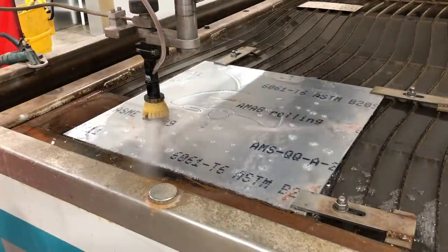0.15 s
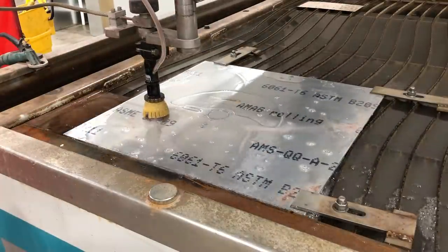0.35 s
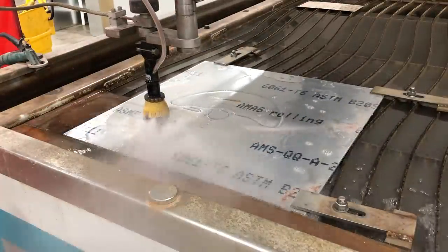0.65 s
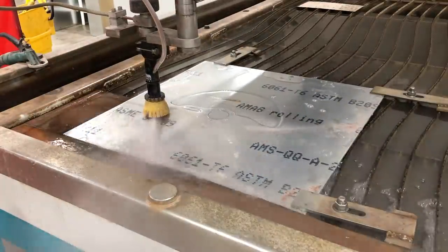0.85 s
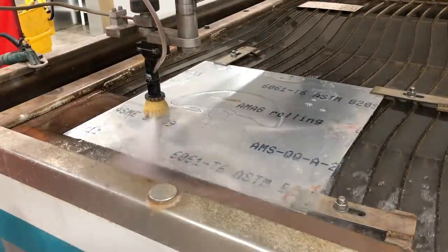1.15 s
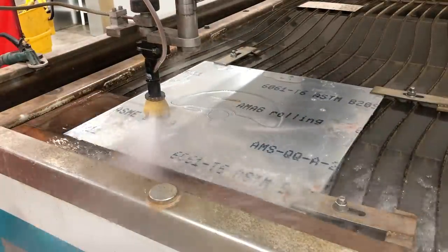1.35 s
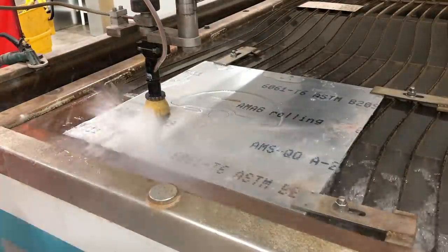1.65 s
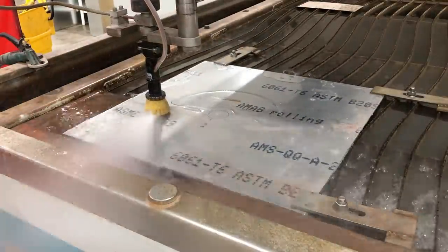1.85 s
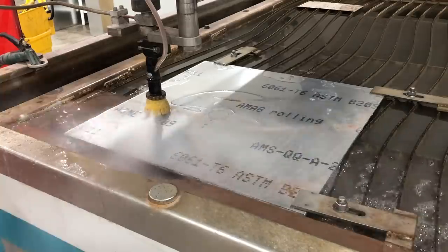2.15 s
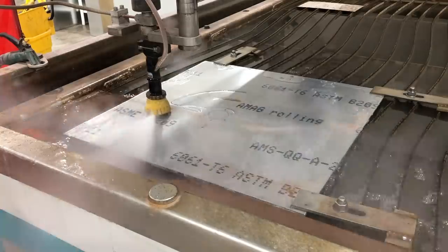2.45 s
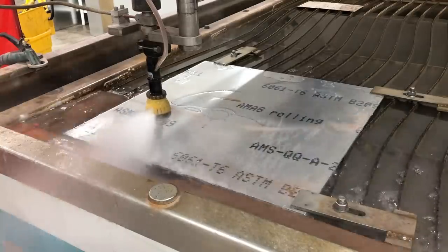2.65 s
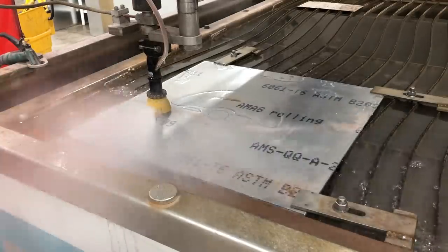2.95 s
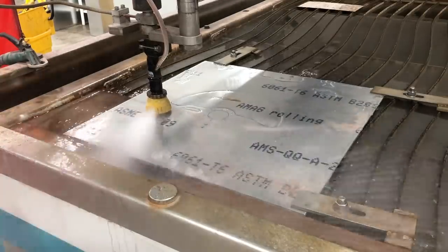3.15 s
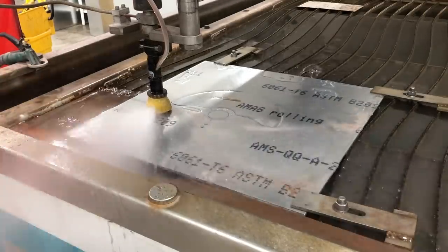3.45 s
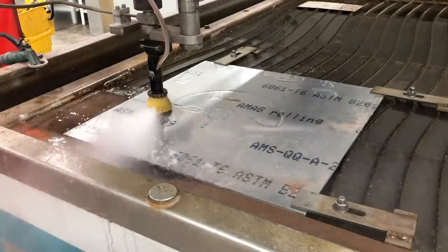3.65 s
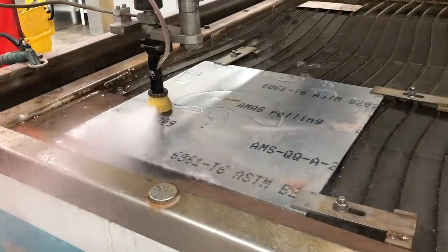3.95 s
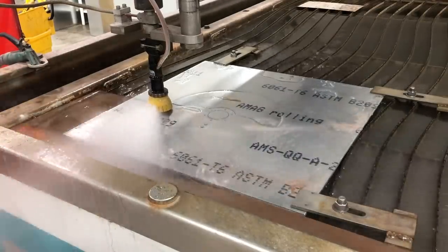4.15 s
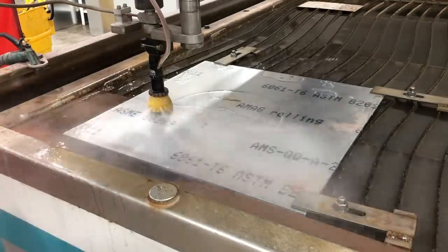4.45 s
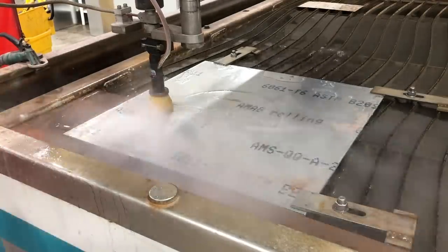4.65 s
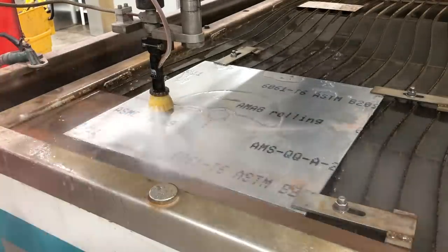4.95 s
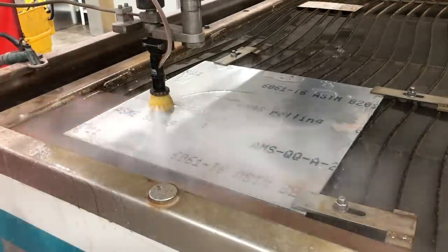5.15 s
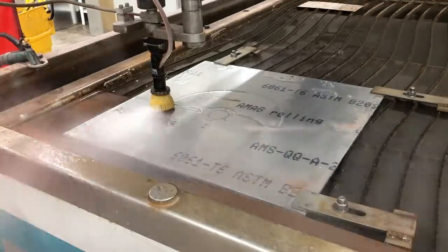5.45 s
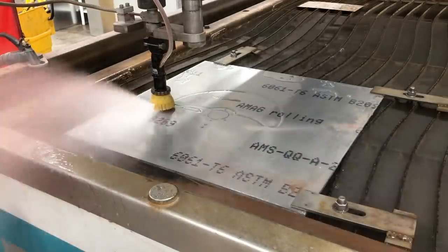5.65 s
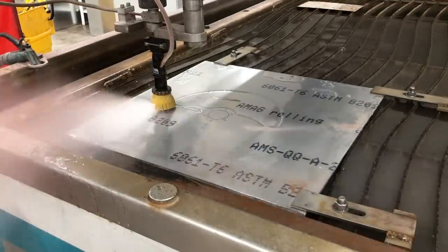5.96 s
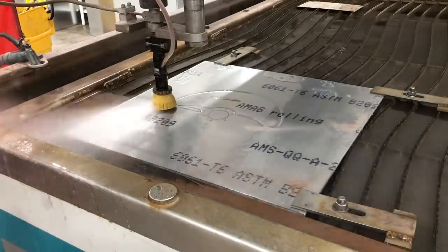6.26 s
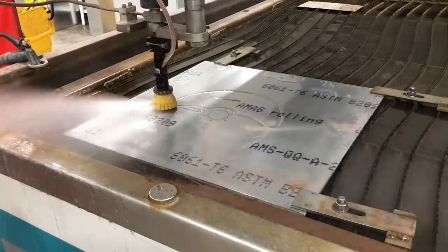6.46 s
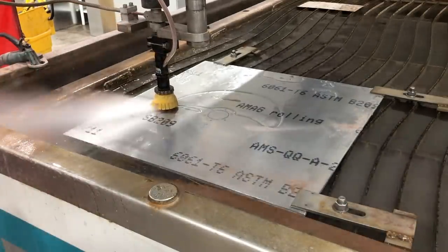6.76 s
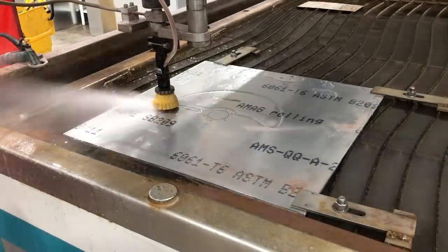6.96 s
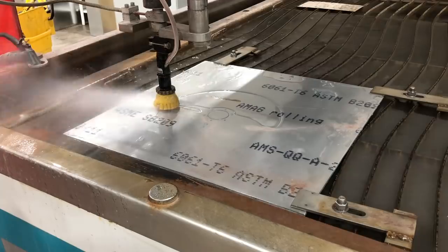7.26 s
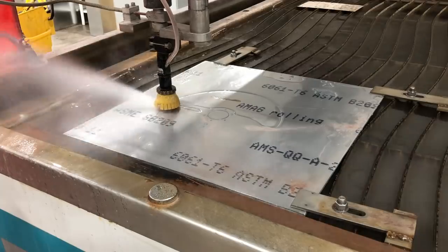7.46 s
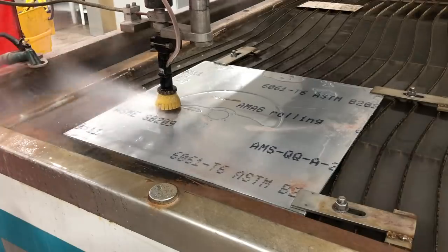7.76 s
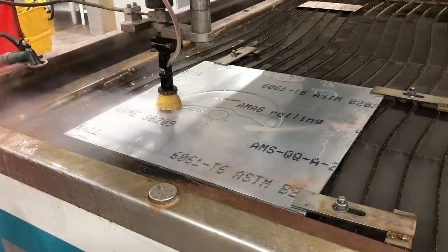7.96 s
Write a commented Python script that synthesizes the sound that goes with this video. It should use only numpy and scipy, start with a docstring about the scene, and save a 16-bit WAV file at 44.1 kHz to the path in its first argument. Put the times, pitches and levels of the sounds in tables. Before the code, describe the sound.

Close up in a workshop, a waterjet cutter hisses harshly through a sheet of aluminium while water splashes and gurgles beneath. The hiss keeps choking and surging, dips briefly, and is joined by rough, thumping bursts of churning water. Halfway through, the rumble falls away and the hiss turns quieter and uneven, with a few spits, before building back into a stronger, more even spray.

```python
"""A waterjet cuts an aluminium sheet close to a mono microphone. Its hiss is broadband noise that surges
and sags as spray is thrown about, with lower splashing beneath; both change colour twice with the cut.
In bursts the water roars and thumps, in clicks dispersed so that their bass arrives late.
Two faint whistles, narrow resonances driven by noise, sound at the start; a wider one flares once."""
import sys
import numpy as np
from scipy import signal
from scipy.fft import rfft, irfft, next_fast_len
from scipy.io import wavfile
from scipy.ndimage import uniform_filter1d, map_coordinates

SR = 44100
rng = np.random.default_rng(int(sys.argv[2]) if len(sys.argv) > 2 else 0)


def generate_wav(signal):
    """Clip the signal to [-1, 1] and save it as 16-bit WAV at the path in sys.argv[1]."""
    frames = np.transpose(np.atleast_2d(signal))
    scaled = np.clip(frames, -1, 1) * 32767
    pcm = np.round(scaled).astype(np.int16)
    wavfile.write(sys.argv[1], SR, pcm)


N = 357651
TIME = np.arange(N) / SR
EVENT_TIME = np.arange(-SR // 4, SR // 4 + 1) / SR  # seconds from an event's onset


def amp(db):
    """Amplitude ratio of a level in decibels."""
    return 10 ** (np.asarray(db) / 20)


def unit(x):
    """Normalisation to an rms of 1."""
    return x / np.sqrt(np.mean(x ** 2) + 1e-20)


def spectrum_db(points, hz):
    """Spectral envelope through (frequency_hz, level_db) points on a log axis, silent outside."""
    frequency_hz, level_db = np.transpose(points)
    return np.interp(np.log(hz + 1), np.log(frequency_hz + 1), level_db, left=-120, right=-120)


def curves(rows):
    """Linear interpolation in time of each column after the first."""
    time_s, *columns = np.transpose(rows)
    return [np.interp(TIME, time_s, column) for column in columns]


def wobble(rate):
    """Smooth random modulation with `rate` knots a second."""
    return map_coordinates(rng.standard_normal(int(N * rate / SR) + 4), [TIME * rate])


def at_times(rows, shape):
    """Convolution places a centred copy of a shape at each (time_s, size)."""
    time_s, size = np.transpose(rows)
    impulses = np.bincount(np.round(time_s * SR).astype(int), size, N)
    return signal.fftconvolve(impulses, shape, mode="same")


def filtered(x, response):
    """Linear filtering: the spectrum is multiplied by a frequency response."""
    size = next_fast_len(N + SR // 2)
    return irfft(rfft(x, size) * response(np.fft.rfftfreq(size, 1 / SR)), size)[..., :N]


def patchy_noise(patch_db, streak_db):
    """White noise modulated in time and frequency by broad patches and thin, lasting streaks."""
    spectra = signal.stft(rng.standard_normal(N + 1024), nperseg=1024)[2]

    def field(bins, frames):
        bands = uniform_filter1d(rng.standard_normal(spectra.shape), bins, axis=0)
        return unit(uniform_filter1d(bands, frames, axis=1))

    gain_db = patch_db * field(bins=16, frames=4) + streak_db * field(bins=2, frames=24)
    return signal.istft(spectra * amp(gain_db), nperseg=1024)[1][:N]


def dispersion(hz, cycles):
    """All-pass with group delay cycles / hz below 3 kHz: a click becomes a falling chirp."""
    return np.exp(-2j * np.pi * cycles * np.log(np.clip(hz, 15, 3000) / 3000))


def resonance(pitch_hz, width_hz):
    """A second-order resonator driven by white noise gives a breathy tone."""
    response = lambda hz: 1j * hz * width_hz / (pitch_hz ** 2 - hz ** 2 + 1j * hz * width_hz)
    return unit(filtered(rng.standard_normal(N), response))


def whistles():
    """Resonances in the hiss: two narrow ones waver, fade and stop; a wider one flares briefly."""
    # narrow resonances: pitch_hz, width_hz, start_level_db, fade_db_per_s
    modes = [(4800, 240, -41, 3), (8450, 300, -35, 6)]
    end_s, flare_s, flare_half_s = 1.7, 2.34, 0.032
    fading = sum(amp(db - fade * TIME + 2.6 * wobble(13)) * resonance(pitch_hz, width_hz)
                 for pitch_hz, width_hz, db, fade in modes)
    flare = amp(-24.5) * np.exp(-((TIME - flare_s) / flare_half_s) ** 2)
    return fading * (TIME < end_s) + flare * resonance(pitch_hz=9000, width_hz=1400)


def thumps():
    """Dispersion smears an impulse and two weaker ones close behind into a low, falling chirp."""
    # single thumps: time_s, first_peak_db
    events = [(1.438, -21), (1.492, -23), (1.666, -18.5), (1.734, -19.5), (1.78, -16.5), (1.935, -15.5),
              (2.672, -25), (2.743, -32), (2.761, -15), (2.864, -24), (2.956, -15), (2.979, -17.5),
              (3.053, -12.5), (3.07, -15.5), (3.128, -20.5), (3.165, -27), (3.207, -15.5), (3.24, -18),
              (3.799, -16), (3.819, -22), (3.865, -22), (4.075, -39), (4.275, -44), (4.951, -25),
              (4.971, -22.5)]
    # spectrum of a thump: frequency_hz, relative_db
    colour = [(20, -48), (50, 4), (100, 5), (400, 1.5), (1000, -4), (2500, -26), (6000, -57)]
    deep_db = lambda hz: 0.5 * np.clip((320 - hz) / 160, 0, 1)
    response = lambda hz: amp(spectrum_db(colour, hz) + deep_db(hz)) * dispersion(hz, cycles=1.64)
    delays_s = rng.uniform(0.0019, 0.00935, (len(events), 2))
    sizes = 0.45 * rng.uniform(0.16, 1, (len(events), 2))
    pushes = np.zeros(N)
    for (time_s, db), delay_s, size in zip(events, delays_s, sizes):
        samples = np.round((time_s + np.r_[0, delay_s]) * SR).astype(int)
        pushes[samples] = amp(db) * np.r_[1, size]
    impulse_peak = np.abs(filtered(signal.unit_impulse(N, SR), response)).max()
    return filtered(pushes, response) / impulse_peak


def roar():
    """Shot noise of the water: random clicks over lumpy noise, gated in bursts and dispersed."""
    # bursts of low roar: start_s, end_s, level_db
    bursts = [(0.019, .05, -30), (0.718, 0.786, -33.5), (1.431, 1.493, -21), (1.587, 1.666, -23),
              (1.782, 1.794, -28), (1.871, 1.925, -22.5), (2.428, 2.478, -39), (2.673, 2.771, -24.5),
              (2.858, 2.963, -23.5), (3.036, 3.094, -26.5), (3.163, 3.205, -24), (3.231, 3.439, -22.5),
              (3.458, 3.811, -21.5), (3.857, 3.869, -16.5), (4.928, 4.972, -46), (5.252, 5.283, -34),
              (7.128, 7.208, -30.5), (7.572, 7.62, -31)]
    # spectrum of the roar: frequency_hz, relative_db
    colour = [(15, -56), (25, -27), (136, -5.5), (172, -4.5), (357, -4.5), (486, 1), (567, -3.5),
              (1070, -8), (1270, -11.5), (2500, -15.5), (3250, -13), (5500, -120)]
    edge_s, clicks_per_s = 0.0011, 450
    level = sum(amp(db) * gate(start, end, edge_s) for start, end, db in bursts)
    clicks = (rng.random(N) < clicks_per_s / SR) * rng.standard_normal(N)
    drive = 0.88 * unit(clicks) + 0.61 * rng.standard_normal(N) * amp(1.5 * wobble(90))
    response = lambda hz: amp(spectrum_db(colour, hz)) * dispersion(hz, cycles=1.61)
    return filtered(level * drive, response) / np.std(filtered(drive, response))


def gate(start_s, end_s, edge_s):
    """Trapezoidal envelope with linear edges."""
    return np.clip(np.minimum(TIME - start_s, end_s - TIME) / edge_s, 0, 1)


def splash_gain_db(jet_db, choke_db):
    """Amplitude modulation of the splashing: it follows the jet, gurgles and sinks in lulls."""
    # lulls in the splashing: start_s, end_s, depth_db
    lulls = [(0.66, .72, 3), (1.004, 1.088, 12), (1.654, 1.73, 15), (1.54, 1.585, 3), (1.96, 2.0, 8),
             (2.009, 2.423, 12.5), (4.285, 4.74, 8), (4.972, 5.26, 7.5), (7.228, 7.33, 4.5), (7.82, 8.2, 3)]
    full_flow_db = -26
    lull_db = sum(depth * gate(start, end, edge_s=0.034) for start, end, depth in lulls)
    gurgle_db = 2.2 * wobble(18)
    return 0.75 * (jet_db - full_flow_db) + gurgle_db - lull_db - 0.32 * choke_db


def splash(colour):
    """Thrown water as band-limited noise, low in the spectrum."""
    noise = patchy_noise(patch_db=0.5, streak_db=0.33)
    return unit(filtered(noise, lambda hz: amp(spectrum_db(colour, hz))))


def pulse(age_s, rise_s, decay_s, stretch=1):
    """Transient envelope: exponential rise and decay; a stretch below 1 lengthens the tail."""
    age_s = np.clip(age_s, 0, None)
    return (1 - np.exp(-age_s / rise_s)) * np.exp(-(age_s / decay_s) ** stretch)


def unsteady_flow():
    """Flow transients: the amplitude added by surges and spits, and the dB lost to chokes and drops."""
    # the jet chokes, then surges: surge_s, surge_db, choke_db (negative lifts the level)
    sputters = [(.306, -47, 6), (.413, -50, 4), (.474, -32, 1), (.606, -22, 0), (.678, -26.5, 4.5),
                (0.723, -26, 2), (.806, -20.5, -4.5), (.875, -32, -3.5), (.995, -39, -3), (1.044, -29, 7.5),
                (1.231, -28.5, 3), (1.288, -21.5, 2), (1.365, -22.5, 0), (1.406, -21, 8), (1.575, -21.5, 3),
                (1.723, -23, 4), (1.892, -30, 2.5), (2.002, -45, -1), (2.43, -36, 6), (2.591, -31, 2),
                (2.632, -39, 2.5), (2.664, -26, 7), (2.855, -28, 1), (3.045, -29, 7), (3.108, -28, 6),
                (3.154, -25, 1), (3.233, -29, 4), (3.998, -35, 4), (4.15, -30, -2), (4.761, -46, 5),
                (4.95, -22.5, -5), (5.257, -22.5, -3.5), (5.487, -27, -3), (5.558, -29.5, 4),
                (5.613, -28, 3), (7.2, -27, -2.5), (7.361, -27, -1), (7.65, -39, 0), (7.79, -29, -1),
                (7.895, -23.5, 0)]
    # sharp spits: time_s, strength_db
    spits = [(5.043, -27), (5.907, -25), (5.985, -29), (5.995, -36), (6.014, -22), (6.033, -26),
             (6.08, -33)]
    # sudden drops of the jet that heal more slowly: time_s, depth_scale_db
    drops = [(.836, 4.5), (1.071, 5.5), (2.776, 7), (4.99, 8), (7.27, 6), (7.43, 3.5), (8.02, 3)]
    choke_lead_s, choke_half_s = 0.008, 0.0064
    surge = pulse(EVENT_TIME + 0.0013, rise_s=0.0042, decay_s=0.018, stretch=0.88)
    spit = pulse(EVENT_TIME + 0.0013, rise_s=0.00084, decay_s=0.0052)
    drop = pulse(EVENT_TIME, rise_s=0.0028, decay_s=0.023)
    choke = np.exp(-((EVENT_TIME + choke_lead_s) / choke_half_s) ** 2)
    added = at_times([(s, amp(db)) for s, db, _ in sputters], surge)
    added += at_times([(s, amp(db)) for s, db in spits], spit)
    lost_db = at_times([(s, depth) for s, _, depth in sputters], choke) + at_times(drops, drop)
    return np.abs(added), lost_db


def hiss(colour, spray):
    """Spectrally shaped noise of the cut plus spray, in three bands whose balance drifts."""
    # band levels relative to the middle band: time_s, treble_db, body_db
    balance = [(0, 2.5, -4.5), (.6, 3, -6), (.77, -1, -5.5), (2.05, -0.5, -10), (2.4, -1.5, -7.5),
               (2.5, -2, -6), (3.86, -1, -10.5), (3.9, -2.5, -2), (4.1, -3.5, -2.5), (4.5, 0.5, -8.5),
               (4.72, -10, -1), (4.82, -1, -6), (5.23, 0.5, -7), (5.28, -.6, 1), (5.33, -3.5, -6.5),
               (5.67, 0.2, -5), (5.94, -5.5, 1.3), (6.05, -3.5, -1.4), (6.43, 0, -3.5), (6.55, -1.3, -2.5),
               (8.11, -1, -5)]
    treble_db, body_db = curves(balance)
    noise = patchy_noise(patch_db=1.22, streak_db=2.0)
    sound = unit(filtered(noise, lambda hz: amp(spectrum_db(colour, hz)))) + spray
    treble = filtered(sound, lambda hz: np.clip((hz - 8800) / 1000, 0, 1))
    body = filtered(sound, lambda hz: np.clip((3900 - hz) / 500, 0, 1))
    return unit(sound - treble - body) + amp(treble_db) * unit(treble) + amp(body_db) * unit(body)


def jet():
    """Flow noise: the jet's strength modulates hiss and splashing through three stages of the cut."""
    # strength of the jet: time_s, gain_db
    strength = [(0.0, -27.5), (1.02, -25.5), (1.15, -28), (1.26, -24.5), (1.51, -25.5), (1.56, -30),
                (1.58, -27.5), (1.87, -24.5), (1.99, -31.5), (2.01, -23.5), (2.08, -27), (2.14, -33.5),
                (2.3, -33), (2.35, -33), (2.39, -37.5), (2.46, -21), (2.48, -31.5), (2.55, -31.5),
                (2.69, -23), (2.8, -24.5), (3.12, -22.5), (3.73, -23), (3.86, -23.5), (3.88, -32),
                (4.18, -30.5), (4.22, -32.5), (4.36, -37), (4.7, -42), (4.81, -23), (4.88, -29.5),
                (4.95, -26), (5.15, -38), (5.19, -34.5), (5.24, -33), (5.26, -34.5), (5.31, -32),
                (5.51, -33.5), (5.58, -24.5), (5.94, -33.5), (6.1, -24), (6.41, -24), (6.6, -26.5),
                (7.63, -26.5), (8.0, -24), (8.02, -24.5), (8.11, -20.5)]
    # boundaries of the stages: time_s
    stages = [0.001, 0.631, 3.875, 8.2]
    # hiss spectrum, one list a stage: frequency_hz, relative_db
    hiss_colours = [
        [(820, -7.5), (1400, -6.5), (2320, -4.5), (2700, -6), (2960, -7), (4350, -6.5), (4710, -4.5),
         (6920, -5), (8390, -0.5), (9370, -8), (15700, -2)],
        [(820, -11), (1400, -6), (2700, -1.5), (3180, 0), (4480, 2.5), (4910, 3.5), (6250, 2.5), (9860, 4),
         (10800, 2.5), (15100, 0), (15700, 4)],
        [(820, -19), (1450, -2.5), (2750, 2.5), (3150, 0.5), (3650, -12), (4660, -3.5), (6320, -9.5),
         (7250, -0.5), (8300, 0.5), (9600, -9), (10900, -4), (12300, -12), (13900, -5.5), (15700, -17)],
    ]
    # splash spectrum, one list a stage: frequency_hz, relative_db
    splash_colours = [
        [(18, -64), (30, -38), (59, -19.5), (173, -13.5), (204, -7), (447, -11), (630, -0.5), (832, -20),
         (1500, -8.5), (1950, -31), (3300, -120)],
        [(18, -53), (30, -16), (129, -3.5), (553, -1), (651, 2), (706, -3.5), (1500, -3), (1950, 2.5),
         (3300, -120)],
        [(18, -53), (30, -21), (129, -3), (792, 1), (1030, 1), (1120, -0.5), (1500, -2), (1950, -33),
         (3300, -120)],
    ]
    # splashing at full flow, one value a stage: level_db
    splash_db = [-33.5, -38, -37]
    jet_db, = curves(strength)
    steady = amp(jet_db)
    surge, choke_db = unsteady_flow()
    wet_db = splash_gain_db(jet_db, choke_db)
    splash_surge = 1 + 0.77 * surge / steady  # only part of a surge reaches the splashing
    spray = unit(filtered(patchy_noise(patch_db=1.0, streak_db=-0.5), lambda hz: hz > 2800))
    spray *= amp(np.interp(TIME, [5.9, 6.6], [-20, -10]))
    sound = np.zeros(N)
    for i, (start_s, end_s) in enumerate(zip(stages, stages[1:])):
        active = 1. * ((TIME >= start_s) & (TIME < end_s))
        crossfade = np.sqrt(np.abs(uniform_filter1d(active, 100, mode="nearest")))  # equal power
        cut = (steady + surge) * hiss(hiss_colours[i], spray)
        water = amp(splash_db[i] + wet_db) * splash_surge * splash(splash_colours[i])
        sound += crossfade * (cut + water)
    flutter_db = 0.5 * wobble(40) + wobble(90) + 0.44 * wobble(200)  # quick changes of flow
    return sound * amp(flutter_db - choke_db)


def scene():
    """Superposition of all sources at one microphone, which feeds both channels."""
    mono = jet() + whistles() + roar() + thumps()
    return np.array([mono, mono])


def record(dry):
    """Soft saturation in the input stage rounds the highest peaks; a low-pass limits the band."""
    ceiling, cutoff_hz = 0.56, 15760
    rounded = dry / (1 + np.abs(dry / ceiling) ** 5) ** (1 / 5)
    return filtered(rounded, lambda hz: hz < cutoff_hz)


dry = scene()
out = record(dry)
generate_wav(out)
```